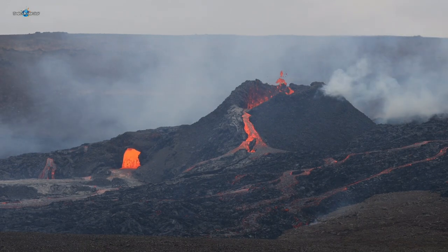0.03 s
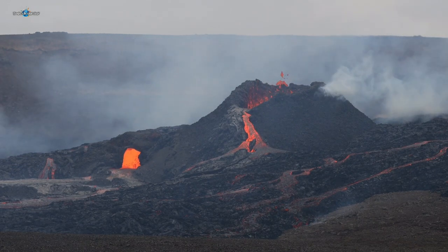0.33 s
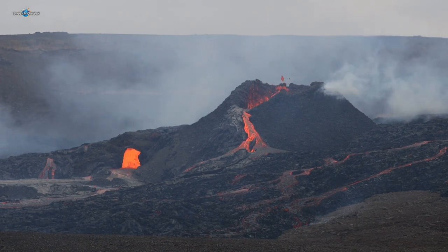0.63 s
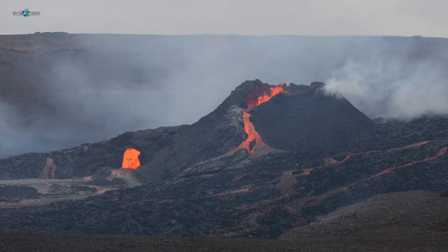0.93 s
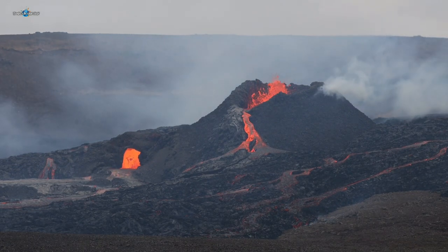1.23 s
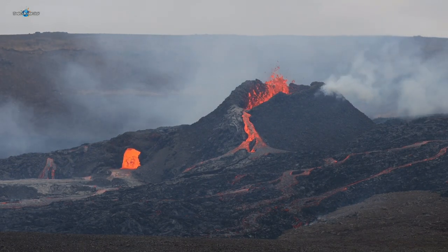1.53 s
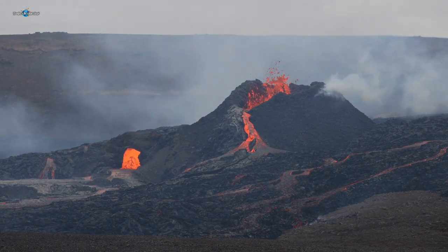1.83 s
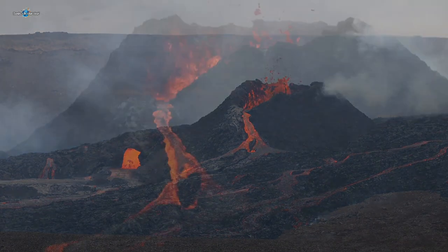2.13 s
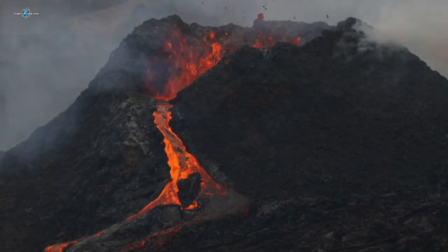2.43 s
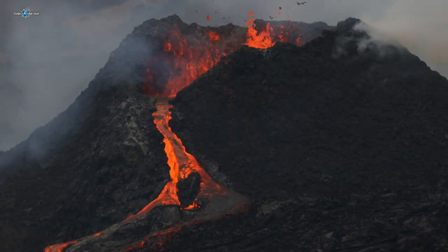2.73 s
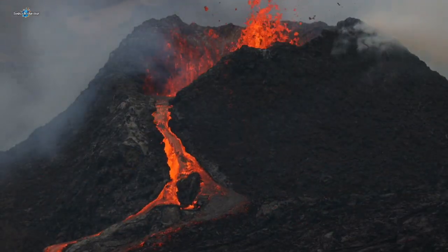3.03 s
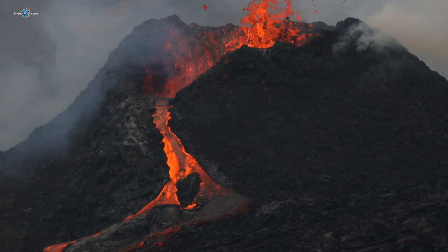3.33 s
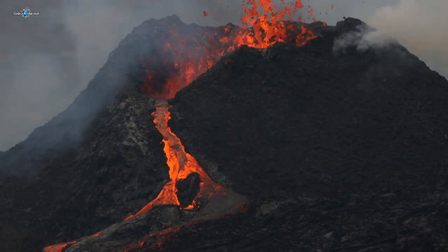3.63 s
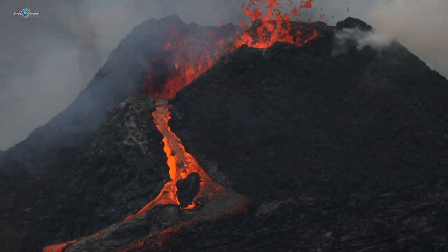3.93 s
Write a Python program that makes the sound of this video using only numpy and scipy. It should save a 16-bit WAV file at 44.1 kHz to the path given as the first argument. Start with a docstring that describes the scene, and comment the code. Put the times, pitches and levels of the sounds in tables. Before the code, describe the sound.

A lava eruption roars outdoors, distant and dull at first under wind that thumps and flutters on the microphone. The roar then grows closer and brighter, with a few heavy splashes of spatter and a deep rumble.

```python
"""A lava fountain roars across open ground as gas rushes through churning lava and clots patter down.
It is far off and dull at first, then near and bright as it surges, with heavy splashes of spatter,
a deep rumble and a faint hiss. Wind buffets the microphone in short gusts: large eddies (swirls
of air) thump, small ones flutter, and the strongest overload it softly."""
import sys
import numpy as np
from scipy import signal
from scipy.fft import rfft, irfft
from scipy.io import wavfile
from scipy.ndimage import uniform_filter1d

SR = 44100
rng = np.random.default_rng(int(sys.argv[2]) if len(sys.argv) > 2 else 0)


def wrap_up_sound(samples):
    """Save the sound to the file named by the first command line argument, as 16-bit audio."""
    columns = np.atleast_2d(samples).T
    # keep every value between -1 and 1, then stretch to whole-number steps
    tamed = np.clip(columns, -1, 1)
    steps = np.round(tamed * 32767).astype(np.int16)
    wavfile.write(sys.argv[1], SR, steps)


N = 176400
TIME_S = np.arange(N) / SR

# The tone of the lava, shared by its roar and its splashes: pitch_hz, relative_db
LAVA_TONE = [(60, -8.5), (200, 3), (400, 1.5), (620, 2), (900, -4), (1250, -9), (2000, -15), (2900, -21.5),
             (4000, -30.5), (5000, -40.5), (6500, -58), (10000, -76)]


def gain(db):
    """Turn decibels into a number to multiply a sound by."""
    return 10 ** (np.asarray(db) / 20)


def normalize(x):
    """Scale a sound to an average (rms) level of 1."""
    return x / np.sqrt(np.mean(x ** 2) + 1e-20)


def loudness(points):
    """A volume that glides between points of time_s, level_db."""
    return gain(np.interp(TIME_S, *np.array(points).T))


def spectrum_octaves():
    """The pitch of each slot in a spectrum, in octaves above 1 Hz."""
    return np.log2(np.maximum(np.arange(N // 2 + 1), 1) * SR / N)


def shape_tone(x, points):
    """Balance bass and treble by points of pitch_hz, relative_db, then normalize."""
    hz, db = np.array(points).T
    weights = gain(np.interp(spectrum_octaves(), np.log2(hz), db))
    return normalize(irfft(rfft(x) * weights, N))


def band(x, hz, octaves):
    """Keep the pitches near hz; more octaves make the band wider."""
    bell = np.exp(-.5 * ((spectrum_octaves() - np.log2(hz)) / octaves) ** 2)
    return irfft(rfft(x) * bell, N)


def waver(depth_db, per_s):
    """A volume that wanders smoothly and at random."""
    hold = int(SR / per_s)
    steps = rng.standard_normal(512)[np.arange(N) // hold % 512]
    smooth = uniform_filter1d(uniform_filter1d(steps, hold), hold)
    return gain(depth_db * normalize(smooth))


def impacts(per_s, scatter_db):
    """Tiny pushes and pulls, uneven in timing and size."""
    count = int(per_s * N / SR)
    delay = rng.random(count)
    direction = rng.choice([-1, 1], count)
    size = gain(scatter_db * rng.standard_normal(count))
    at = ((np.arange(count) + delay) * N / count).astype(int)
    return normalize(np.bincount(at, direction * size, N)[:N])


def burst(start_s, length_s, rise_s, fade_s):
    """A volume that rises, holds and dies away."""
    t = TIME_S - start_s
    return np.clip(t / rise_s + .5, 0, 1) * np.exp(-np.maximum(t - length_s, 0) / fade_s)


def fountain():
    """Gas rushes through churning lava, each band of pitch flickering, while small clots patter down."""
    # The strength of the fountain: time_s, level_db
    strength = [(0, -38.5), (.28, -38.5), (.48, -45.5), (.9, -45.5), (1.05, -40.5), (1.38, -40.5),
                (1.54, -36), (1.65, -32), (1.7, -35), (1.73, -42), (1.94, -39.5), (2.13, -28.5),
                (2.37, -36), (2.5, -29.5), (2.66, -32.5), (2.74, -30.5), (2.88, -29), (3.02, -30.5),
                (3.54, -27.5), (3.61, -23.5), (3.67, -22), (3.72, -26), (4, -23)]
    gas = sum(waver(depth_db=0.83, per_s=22) * band(rng.standard_normal(N), hz, octaves=0.39)
              for hz in 100 * 2 ** np.arange(0, 6.5, .5))
    churn = waver(depth_db=0.8, per_s=12)
    clots = gain(-5) * shape_tone(impacts(per_s=700, scatter_db=3.5), LAVA_TONE)
    roar = churn * (shape_tone(gas, LAVA_TONE) + clots)
    return loudness(strength) * normalize(roar)


def distance(roar):
    """Air takes the treble from the distant roar; it returns all at once when the listener is close."""
    close_from_s, air_loss_db_per_khz = 2.66, 1.14
    khz = np.arange(N // 2 + 1) * SR / N / 1000
    far = irfft(rfft(roar) * gain(-air_loss_db_per_khz * khz), N)
    return np.where(TIME_S > close_from_s, roar, far)


def eddies(tone):
    """Each swirl of air is one pulse of pressure; smaller ones sound higher and come more often."""
    swirls = sum(band(impacts(per_s=1.2 * hz, scatter_db=2.5), hz, octaves=0.48)
                 for hz in 20 * 2 ** np.arange(0, 7, 2 / 3))
    return shape_tone(swirls, tone)


def wind():
    """Gusts thump and flutter on the microphone over a softer, steadier breeze."""
    # Each gust, with its strength relative to the others: start_s, length_s, thump_db, flutter_db
    gusts = [(0.0, 0.011, -11.5, -22.5), (0.046, 0.028, -15, -25), (0.114, 0.024, -17.5, -23),
             (0.18, 0.011, -17, -20), (0.263, 0.053, -14.5, -23), (0.349, 0.037, -14, -21),
             (0.424, 0.033, -13.5, -22.5), (0.491, 0.035, -17, -21), (0.564, 0.016, -21.5, -25),
             (0.627, 0.017, -10.5, -20.5), (0.67, 0.031, -18, -19), (0.726, 0.015, -17, -20.5),
             (0.773, 0.02, -14.5, -21), (0.835, 0.03, -15, -20), (0.877, 0.014, -14.5, -30.5),
             (0.913, 0.0073, -16.5, -24.5), (0.965, 0.015, -23, -25.5), (1.008, 0.054, -20, -31.5),
             (1.158, 0.031, -16.5, -22.5), (1.206, 0.021, -13, -21), (1.35, 0.016, -17, -29.5),
             (1.449, 0.018, -14, -23.5), (1.518, 0.023, -15, -28), (1.57, 0.029, -15, -23),
             (1.625, 0.022, -14, -20), (1.663, 0.013, -16, -20.5), (1.702, 0.017, -18.5, -24),
             (1.77, 0.019, -18, -19.5), (1.804, 0.02, -13, -29), (1.856, 0.049, -19, -28),
             (2.051, 0.047, -14.5, -22), (2.143, 0.079, -20, -25), (2.257, 0.073, -16, -24),
             (2.364, 0.053, -19.5, -33), (2.708, 0.032, -18, -27.5), (3.041, 0.056, -15.5, -35),
             (3.969, 0.038, -12, -28)]
    # The wind between the gusts: time_s, level_db
    breeze_levels = [(0, -21.5), (.45, -18.5), (1.1, -25), (1.4, -21.5), (1.62, -24.5), (1.95, -23.5),
                     (2.2, -18), (2.48, -22), (2.65, -25), (2.85, -22), (3.1, -22), (3.45, -14), (3.8, -22),
                     (4, -21.5)]
    # The tones of large eddies, small eddies and the breeze: pitch_hz, relative_db
    thump_tone = [(12, -26.5), (25, -0.5), (50, 2.5), (80, -1), (125, -4), (190, -7), (280, -14.5),
                  (400, -28), (700, -63.5)]
    flutter_tone = [(120, -18.5), (220, 1.5), (300, 2.5), (450, -1), (650, -7.5), (850, -14.5), (1050, -28),
                    (1300, -47), (2000, -67)]
    breeze_tone = [(12, -18), (27, 1.5), (55, 1.5), (100, -1.5), (180, -5.5), (270, -10.5), (400, -21),
                   (700, -33.5), (1200, -53.5)]
    thump_volume, flutter_volume = np.zeros(N), np.zeros(N)
    for start_s, length_s, thump_db, flutter_db in gusts:
        thump_volume += gain(thump_db) * burst(start_s, length_s, rise_s=.005, fade_s=0.018)
        flutter_volume += gain(flutter_db) * burst(start_s, length_s, rise_s=.005, fade_s=0.0097)
    thump = gain(0.5) * thump_volume * eddies(thump_tone)
    flutter = gain(-0.5) * flutter_volume * eddies(flutter_tone)
    breeze = loudness(breeze_levels) * eddies(breeze_tone)
    clumps = normalize(waver(depth_db=1.5, per_s=160))  # the flutter comes in quick clumps
    return thump + flutter * clumps + breeze


def hiss():
    """A faint, smooth hiss sits high above the roar."""
    # The strength of the hiss: time_s, level_db
    levels = [(0, -67), (.6, -74.5), (1.64, -69.5), (1.74, -75), (2.4, -70.5), (2.95, -62.5), (4, -57)]
    # Its bright tone: pitch_hz, relative_db
    tone = [(2000, -12.5), (5000, 4), (8000, 1), (15500, -1)]
    return loudness(levels) * shape_tone(rng.standard_normal(N), tone)


def slaps():
    """A hard eddy slaps the microphone: one brief suction with a small push on either side."""
    # Single hard eddies, before the overload: time_s, peak_db, pitch_hz
    hard_eddies = [(.199, -6.5, 150), (.286, -6, 176), (.331, -2, 127), (0.384, -10.5, 174),
                   (.432, -5.5, 336), (.467, -3, 129), (.630, -6.5, 380), (.686, -7.5, 300),
                   (.785, -6.5, 340), (.842, -9, 490), (.870, -4.5, 237), (.919, -6, 260),
                   (1.163, -9.5, 344), (1.184, -5.5, 105), (1.225, -6, 190), (1.459, -4, 190),
                   (1.64, -11, 520), (1.649, -2, 129), (1.672, -6.5, 178), (1.712, 1.5, 140),
                   (1.817, -4.5, 111), (2.302, -7, 279), (3.102, -3.5, 128)]
    out = np.zeros(N)
    for time_s, peak_db, pitch_hz in hard_eddies:
        offset_squared = (np.pi * pitch_hz * (TIME_S - time_s)) ** 2
        out -= gain(peak_db) * (1 - 2 * offset_squared) * np.exp(-offset_squared)
    return out


def splashes():
    """Heavy sheets of spatter land with a short, dull rush."""
    # Each fall of spatter: start_s, length_s, level_db, pitch_hz
    falls = [(2.796, 0.012, -25, 920), (2.933, 0.0088, -31, 1000), (3.336, .025, -36.5, 1600),
             (3.64, 0.038, -41, 1980), (3.768, .022, -22.5, 820), (3.847, .025, -33.5, 1190)]
    out = np.zeros(N)
    for start_s, length_s, level_db, pitch_hz in falls:
        noise = shape_tone(rng.standard_normal(N), LAVA_TONE)
        rush = normalize(band(noise, pitch_hz, octaves=0.43))
        out += gain(level_db) * rush * burst(start_s, length_s, rise_s=0.0063, fade_s=0.011)
    return out


def rumble():
    """A deep churning swells as the fountain climbs."""
    # The strength of the rumble: time_s, level_db
    levels = [(2.95, -55), (3.1, -29), (3.25, -22), (3.6, -20), (3.76, -28)]
    pitch_hz = 155.7
    churning = band(impacts(per_s=2 * pitch_hz, scatter_db=0.91), pitch_hz, octaves=0.57)
    return loudness(levels) * normalize(churning)


def scene():
    """The eruption with the wind in front; overload rounds off the strongest gusts."""
    overload_limit = 0.89
    lava = hiss() + splashes() + distance(fountain())
    buffeting = overload_limit * np.tanh((wind() + slaps()) / overload_limit)
    return (lava + buffeting + rumble())[None]


def record(dry):
    """Ease the sound in and out and cut the highest treble."""
    fade_s, top_hz = .003, 15750
    from_edge_s = np.minimum(TIME_S, TIME_S[::-1])
    fade = np.sin(np.pi / 2 * np.minimum(from_edge_s / fade_s, 1)) ** 2
    treble_cut = signal.ellip(8, .2, 70, top_hz, fs=SR, output="sos")
    return signal.sosfilt(treble_cut, dry * fade)


dry = scene()
out = record(dry)
wrap_up_sound(out)
```